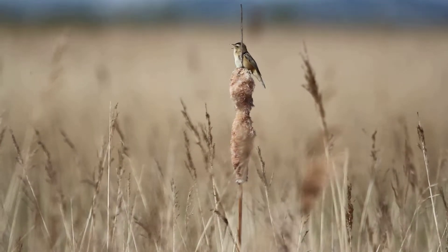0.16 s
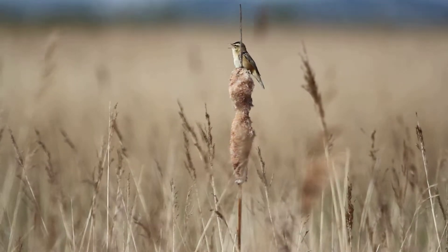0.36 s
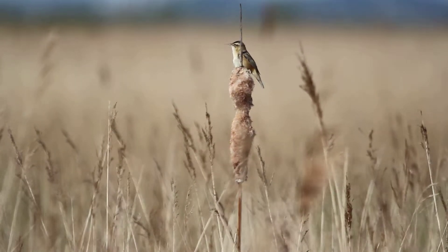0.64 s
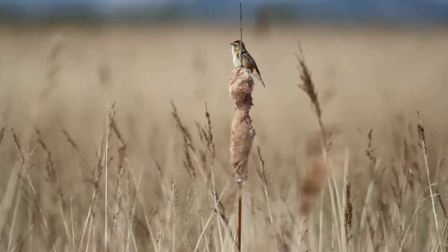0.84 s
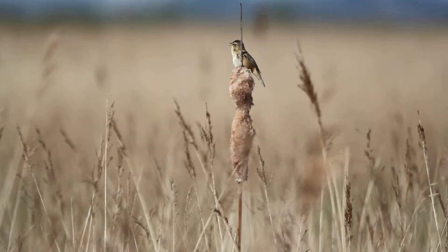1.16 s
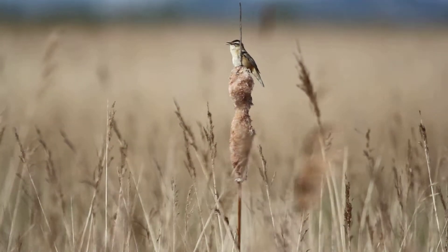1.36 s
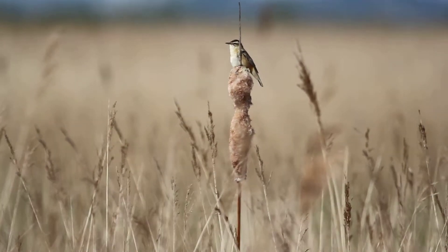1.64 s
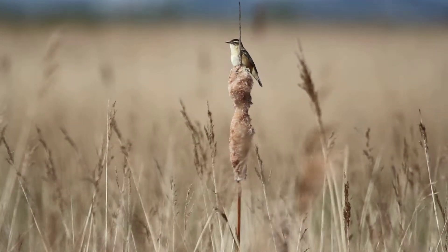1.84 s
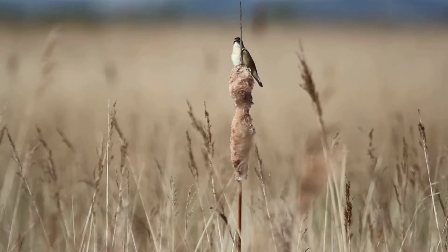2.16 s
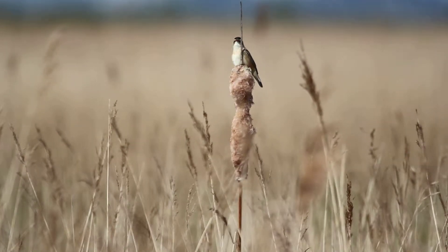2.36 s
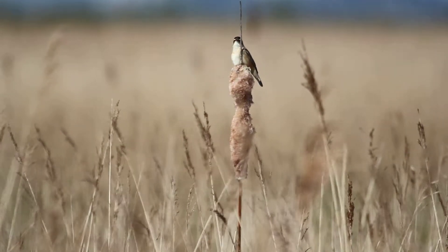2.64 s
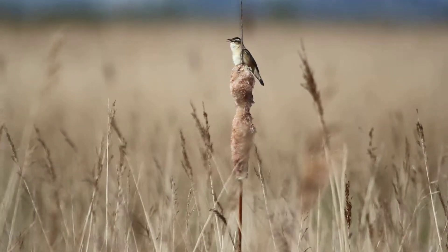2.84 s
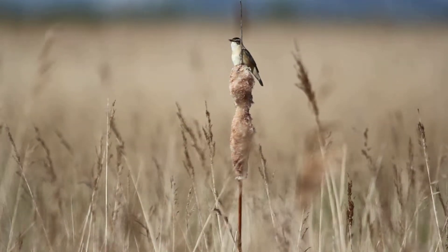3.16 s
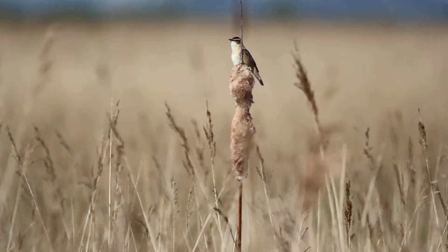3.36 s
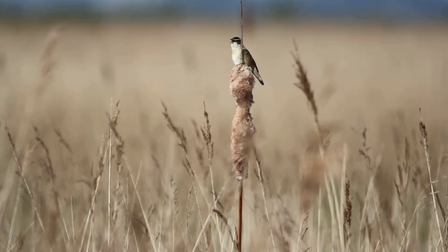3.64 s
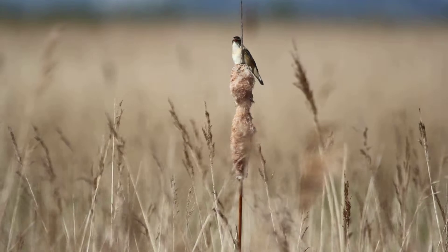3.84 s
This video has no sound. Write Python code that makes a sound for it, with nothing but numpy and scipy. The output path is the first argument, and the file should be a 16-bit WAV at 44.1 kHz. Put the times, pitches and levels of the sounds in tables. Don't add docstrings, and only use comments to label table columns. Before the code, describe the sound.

Small bird's song of fast churrs, thin whistles and scratchy repeated calls, with faint wind thumps outdoors

```python
import sys
import numpy as np
from scipy import signal
from scipy.fft import rfft, irfft
from scipy.io import wavfile
from scipy.ndimage import uniform_filter1d

SR = 44100
rng = np.random.default_rng(int(sys.argv[2]) if len(sys.argv) > 2 else 0)


def attenuation_scalar(level_db):
    decades = np.asarray(level_db, float) / 20
    return 10 ** decades


def int16_out(signal):
    q = np.round(np.clip(np.atleast_2d(signal).T, -1, 1) * 32767)
    wavfile.write(sys.argv[1], SR, q.astype(np.int16))


N = 176400

CHUR_WINDOW_S = 0.06


def shaped(x, points):
    hz, db = np.transpose(points)
    log_hz = np.log(np.fft.rfftfreq(len(x), 1 / SR) + 1)
    gain_db = np.interp(log_hz, np.log(hz), db, left=-90, right=-90)
    y = irfft(rfft(x) * attenuation_scalar(gain_db), len(x))
    return y / np.std(y)


def drift(rate_hz):
    r = np.exp(-2 * np.pi * rate_hz / SR)
    slow = signal.lfilter([1], [1, -2 * r, r * r], rng.standard_normal(N + SR))[SR:]
    return slow / np.std(slow)


def gate(t, start, end, attack, release):
    ramp = np.minimum((t - start) / attack, (end - t) / release)
    return np.sin(np.pi / 2 * np.clip(ramp, 0, 1)) ** 2


def add(out, start_s, x):
    i = int(start_s * SR)
    out[i:i + len(x)] += x[:N - i]


def turns(hz):
    return 2 * np.pi * np.cumsum(hz) / SR


def singer():
    voice = churs() + chacks() + buzz() + whistles()
    bent = voice ** 3 / (uniform_filter1d(voice ** 2, size=220) + attenuation_scalar(-73))
    treble = signal.butter(6, 10700, "high", fs=SR, output="sos")
    return voice + attenuation_scalar(-22.5) * signal.sosfilt(treble, bent)


def churs():
    # end_s, low_voice_hz, high_voice_hz, level_db, high_voice_relative_db
    near_churs = [(0.8765, 2437, 3170, -43, -1.5), (0.9664, 2440, 3156, -40, -6),
                  (1.061, 2400, 3110, -41.5, -4.5), (1.157, 2374, 3080, -41, -4),
                  (1.2449, 2344, 3030, -39.5, -7), (1.333, 2370, 3090, -40.5, -7),
                  (1.423, 2310, 3040, -41.5, -4), (2.024, 2464, 3170, -39, -4),
                  (2.1125, 2430, 3060, -37, -5), (2.204, 2370, 3080, -36, -6),
                  (2.306, 2390, 3150, -35.5, -5.5), (2.3993, 2356, 3130, -35, -6),
                  (2.4867, 2323, 3040, -35.5, -7), (2.5782, 2300, 2856, -35, -11.5),
                  (2.664, 2260, 2910, -35, -10.5), (2.7505, 2213, 2760, -34.5, -14),
                  (2.835, 2206, 2770, -34, -18), (2.918, 2264, 2820, -36.5, -11.5),
                  (3.01, 2324, 2980, -36.5, -7.5), (3.0976, 2397, 3070, -34, -11)]
    out = np.zeros(N)
    for end_s, low_hz, high_hz, db, high_db in near_churs:
        note = chur(low_hz, high_hz, high_db, 0, 12 + 0.6 * high_db)
        add(out, end_s - CHUR_WINDOW_S, attenuation_scalar(db) * note)
    return out


def chur(low_hz, high_hz, high_db, sums_db, hook_db):
    # multiple_of_low, multiple_of_gap, level_db
    sum_tones = [(2, 0, -0.5), (1, 2, -7.5), (2, -1, -7.5), (2, 1, -8.5), (2, 2, -13.5), (3, 0, -20),
                 (3, 1, -27), (1, 3, -14), (2, 3, -29), (3, -1, -21.5), (3, 2, -30), (4, -1, -45.5),
                 (4, 0, -34.5), (4, 1, -36)]
    chur_s, swell_s, low_db = 0.046, 0.018, -11.5
    t = np.arange(-int(CHUR_WINDOW_S * SR), 0) / SR

    def rise(before_end_s, width_s):
        return 1 / (1 + np.exp(-(t + before_end_s) / width_s))

    onset_dip = 0.0667 * np.exp(-np.maximum(t + chur_s, 0) / 0.0023)
    creep = 1 + 0.038 * (t + 0.02505) / chur_s - onset_dip
    low = turns(low_hz * creep * (1 + 0.592 * rise(0.0095, 0.001955)))
    high = turns(high_hz * creep * (1 + 0.883 * rise(0.010, 0.002424)))
    gap = high - low + rng.uniform(0, 8.14)

    both = gate(t, -chur_s, -0.0042, swell_s, 0.0082)
    wobble = 0.002 * np.cumsum(rng.standard_normal(len(t)))
    out = np.zeros(len(t))
    for m, n, db in sum_tones:
        phase = m * low + n * gap + m * n * n + m * m * wobble
        fade = gate(t, -1.11, -0.006 - 0.00022 * m, 1, 0.01)
        out += attenuation_scalar(db + sums_db + rng.normal(0, 1.8)) * fade * np.sin(phase)
    roughness = uniform_filter1d(rng.standard_normal(len(t)), size=60) * np.sqrt(60)
    out *= both * (1 + 0.15 * roughness)

    high_level = attenuation_scalar(high_db + (10.5 + 0.18 * sums_db) * rise(0.021, 0.0023))
    out += both * high_level * np.sin(low + gap)
    low_level = attenuation_scalar(low_db + (hook_db - low_db) * rise(0.01, 0.002))
    out += gate(t, -chur_s, 0.00077, swell_s, 0.0047) * low_level * np.sin(low)
    return np.sqrt(2) * out


def chacks():
    # start_s, level_db
    chack_calls = [(3.162, -24.5), (3.2538, -25), (3.3604, -26.5), (3.4601, -28), (3.5575, -26.5),
                   (3.671, -27), (3.7651, -26.5), (3.875, -26.5)]
    # multiple, level_db
    chack_tones = [(6, -16.5), (10, -2.), (11, -11), (12, -2), (13, -32), (14, -21), (15, -13), (16, -22),
                   (17, -19.5), (18, -20.5), (19, -43), ]
    # pitch_hz, level_db
    tick_throat = [(1180, -35), (2000, -17), (2820, -21.5), (4320, 1), (6360, -8.5), (9190, -28.5),
                   (15500, -25)]
    chack_s, tick_lead_s, tick_s = 0.023, 0.016, 0.016
    out, ticks, t = np.zeros(N), np.zeros(N), np.arange(N) / SR
    u = t[:int(0.03 * SR)]
    bend = 1 - 0.11 * np.exp(-u / 0.00094) - 0.085 * (u / chack_s) ** 2
    for start_s, db in chack_calls:
        phase = turns(411 * (1 + rng.normal(0, 0.012)) * bend)
        tone = np.zeros(len(u))
        for k, tone_db in chack_tones:
            a, b = rng.random(2)
            tone += attenuation_scalar(tone_db + 2.8 * (a - 0.5)) * np.sin(k * phase + 2 * np.pi * b)
        add(out, start_s - 0.0015, attenuation_scalar(db) * tone * gate(u, 0, chack_s + 0.0028, 0.0067, 0.012))
        tick_start_s = start_s - tick_lead_s
        ticks += attenuation_scalar(db - 4.5) * gate(t, tick_start_s, tick_start_s + tick_s, 0.0083, 0.0072)
        ticks += attenuation_scalar(db - 11) * gate(t, start_s - 0.001, start_s + chack_s, 0.003, 0.006)
    return out + ticks * rasp(tick_throat)


def buzz():
    # start_s, length_s, level_db, top_hz
    near_rasps = [
        (.006, 0.014, -36, 1790),
        (3.955, 0.0277, -29.5, 1704),
        (3.984, 0.016, -31.5, 1700),
    ]
    pulses_per_s = 58.3
    pulses = [(0.1365 + k / pulses_per_s, 0.017, -34, 1790) for k in range(9)]
    return arched(near_rasps + pulses)


def arched(rows):
    # multiple, level_db
    buzz_tones = [(1, -23), (2, -10), (3, -3), (4, -9.5), (5, -34)]
    # pitch_hz, level_db
    buzz_throat = [(1180, -27), (2000, -19), (3020, -10), (3320, -2), (5270, 2), (9840, -32), (15000, -38)]
    out, breath = np.zeros(N), rasp(buzz_throat)
    for start_s, length_s, db, top_hz in rows:
        u = np.arange(0, length_s, 1 / SR)
        phase = turns(top_hz * (1 - 0.22 * (2 * u / length_s - 1) ** 2))
        note = attenuation_scalar(-4) * np.resize(breath[int(start_s * SR):], len(u))
        for k, tone_db in buzz_tones:
            flutter = uniform_filter1d(rng.standard_normal(len(u)), size=40) * np.sqrt(40)
            note += attenuation_scalar(tone_db) * (1 + 0.8 * flutter) * np.sin(k * phase)
        add(out, start_s, attenuation_scalar(db) * note * gate(u, 0, length_s, 0.0065, 0.0068))
    return out


def rasp(throat):
    comb = np.zeros(int(SR / 403.5) + 1)
    comb[0], comb[-1] = 1, -0.45
    return shaped(signal.lfilter([1], comb, rng.standard_normal(N)), throat)


def whistles():
    # time_s, pitch_hz, level_db
    whistle_paths = [
        [(.394, 4480, -34.5), (.418, 4780, -28), (.453, 5000, -29.5), (.465, 4590, -27), (.473, 4450, -29)],
        [(.567, 5040, -32.5), (.605, 5105, -35), (.631, 4880, -31.5), (.64, 4480, -28.5), (.648, 4440, -29)],
        [(1.561, 5030, -30), (1.575, 5164, -32), (1.598, 5310, -31.5), (1.621, 5060, -27), (1.637, 4780, -28.5)],
        [(1.752, 5160, -30), (1.774, 5270, -30.5), (1.792, 5350, -30), (1.814, 5250, -29), (1.832, 4770, -29)],
    ]
    seconds_db = [-37, -42, -36.5, -35]
    out = np.zeros(N)
    for rows, second_db in zip(whistle_paths, seconds_db):
        at, pitch_hz, level_db = np.transpose(rows)
        start_s, length_s = at[0], at[-1] - at[0]
        u = np.arange(0, length_s, 1 / SR)
        hz = np.interp(u + start_s, at, pitch_hz) + 45 * drift(85)[:len(u)]
        db = np.interp(u + start_s, at, level_db) + 1.85 * drift(100)[:len(u)]
        phase = turns(hz - 2300 * np.exp(-u / 0.0033))
        second = attenuation_scalar(second_db + 11 * np.exp(-u / 0.008)) * np.sin(2 * phase)
        tone = np.sin(phase) + second
        add(out, start_s, np.sqrt(2) * attenuation_scalar(db) * tone * gate(u, 0, length_s, 0.0031, 0.0026))
    return out


def far_birds():
    # start_s, length_s, from_hz, to_hz, level_db
    far_whistles = [(0.09, .028, 5050, 4500, -70), (0.309, 0.03, 4050, 3700, -64),
                    (.352, .045, 5050, 4900, -67), (0.384, 0.056, 2650, 2900, -60),
                    (0.434, 0.028, 3850, 3520, -53), (0.624, 0.051, 3700, 2680, -52),
                    (0.674, 0.041, 2760, 2520, -53), (0.719, 0.028, 3650, 3640, -56),
                    (0.78, 0.036, 2950, 3480, -49.5), (.817, 0.014, 3250, 3600, -51),
                    (0.959, 0.047, 5750, 5800, -49.5), (1, 0.014, 5850, 5100, -52),
                    (1.429, .045, 3450, 3350, -64), (1.61, 0.048, 2300, 2650, -63),
                    (1.709, 0.039, 3900, 3720, -58.5), (1.86, 0.023, 3500, 4150, -55),
                    (1.773, 0.04, 2900, 3480, -54), (1.944, .025, 4600, 4240, -64),
                    (1.95, .025, 4300, 3460, -61), (2.228, 0.051, 4950, 5700, -49.5),
                    (2.527, 0.039, 5700, 5720, -47), (2.951, 0.049, 3300, 3500, -54),
                    (3.325, 0.0082, 5300, 6270, -47), (3.329, .008, 4900, 5100, -47),
                    (3.39, 0.081, 5100, 5660, -51), (3.734, .02, 4700, 4900, -46),
                    (3.819, 0.013, 4900, 4460, -42), (3.911, .018, 4500, 4650, -45)]
    # end_s, level_db
    far_churs = [(0.073, -43), (0.16, -42), (0.249, -47), (3.67, -47), (3.755, -48.5), (3.851, -51),
                 (3.939, -51), (2.55, -44), (2.638, -45), (2.727, -46), (2.811, -46)]
    # start_s, length_s, level_db, top_hz
    far_rasps = [
        (.505, 0.022, -45, 1210),
        (.527, 0.019, -44, 1210),
        (1.893, 0.019, -49, 1180),
        (1.915, 0.019, -48.5, 1168),
    ]
    # pitch_hz, level_db
    chatter_colour = [(1350, -67), (2300, -25.5), (4820, -2.5), (5700, -4.5), (8000, -16), (10400, -27),
                      (17600, -120)]
    out = attenuation_scalar(-59 + 3.8 * drift(33)) * shaped(rng.standard_normal(N), chatter_colour)
    for start_s, length_s, from_hz, to_hz, db in far_whistles + twitter():
        u = np.arange(0, length_s, 1 / SR)
        glide = from_hz + (to_hz - from_hz) * u / length_s
        phase = turns(glide - 400 * np.exp(-u / 0.0031))
        add(out, start_s, np.sqrt(2) * attenuation_scalar(db) * np.sin(phase) * gate(u, 0, length_s, 0.0012, 0.0023))
    for end_s, db in far_churs:
        add(out, end_s - CHUR_WINDOW_S, attenuation_scalar(db) * chur(2730, 3280, -2, -25, 4))
    return out + arched(far_rasps)


def twitter():
    notes = []
    for a, b, c, d, e in rng.random((150, 5)):
        from_hz = 2600 * 2.3 ** c
        notes.append((3.95 * a, 0.012 + 0.03 * b, from_hz, from_hz * (0.85 + 0.3 * d), -56.5 - 9 * e))
    return notes


def echoes(x):
    u = np.arange(SR // 2) / SR
    tail = rng.standard_normal(len(u)) * attenuation_scalar(-60 * u / 0.35) * (u > 0.003)
    tail = signal.lfilter([1], [1, -0.5], tail)
    return signal.fftconvolve(x, tail / np.sqrt(np.sum(tail ** 2)))[:N]


def reeds():
    # time_s, peak_db
    reed_ticks = [(0.5054, -46), (0.5487, -45), (0.6659, -45), (0.7143, -46), (0.8465, -48), (0.933, -44),
                  (1.0735, -48), (1.2466, -50), (1.2665, -40), (1.6771, -44), (1.8592, -34), (1.9126, -47),
                  (2.14, -38), (2.172, -42), (2.2737, -42), (2.3401, -39), (2.4458, -46), (2.4828, -41),
                  (2.5416, -49), (2.615, -49), (2.7057, -40), (2.801, -49), (2.9522, -45), (3.0634, -46),
                  (3.2141, -51), (3.3004, -33), (3.38, -33), (3.6416, -39), (3.9244, -41), (3.9504, -53)]
    faint = [(3.6 * a, -47 - 5.1 * b) for a, b in rng.random((40, 2))]
    clicks = np.zeros(N)
    for at_s, db in reed_ticks + faint:
        burst = rng.standard_normal(90) * np.exp(-np.arange(90) / 34)
        add(clicks, at_s + 0.0012, attenuation_scalar(db + 0.5) * burst)
    return signal.sosfilt(signal.butter(2, 8000, "high", fs=SR, output="sos"), clicks)


def wind():
    # centre_s, width_s, level_db
    gust_times = [(.29, 0.039, -38.5), (.54, 0.01, -43), (0.783, 0.0065, -20.5), (0.805, 0.016, -19),
                  (1.025, 0.0071, -28), (3.05, 0.013, -38.5), (.93, 0.07, -33.5), (1.151, 0.054, -29.5),
                  (1.669, 0.025, -27.5), (1.99, 0.02, -38), (2.251, 0.014, -33), (2.652, 0.012, -36),
                  (3.564, 0.0093, -20), (3.641, 0.16, -28.5), (3.758, 0.0083, -12.5), (3.812, 0.043, -22.5),
                  (3.914, 0.019, -12)]
    # pitch_hz, level_db
    gust_colour = [(24, -65), (40, -4), (146, 3.5), (245, -7), (399, -21.5), (600, -36.5), (780, -32),
                   (1320, -120)]
    # pitch_hz, level_db
    air_colour = [(15, -29), (25, -3), (75, 8), (241, -6.5), (460, -1.5), (2140, -21), (4800, -22.5),
                  (5790, -33), (15700, -31.5)]
    t = np.arange(N) / SR
    strength = attenuation_scalar(-56.5 + 5.4 * drift(2))
    for centre_s, width_s, db in gust_times:
        strength += attenuation_scalar(db) * np.exp(-((t - centre_s) / width_s) ** 2)
    lumps = shaped(rng.standard_normal(N), gust_colour)
    lumps = lumps / np.sqrt(uniform_filter1d(lumps ** 2, size=1500) + 0.1)
    lumps *= attenuation_scalar(2.5 * drift(30) - 3)
    air = attenuation_scalar(-44.5 + 1.1 * drift(4.2)) * shaped(rng.standard_normal(N), air_colour)
    return strength * lumps + air


def scene():
    birds = singer() + far_birds()
    mix = birds + attenuation_scalar(-13.5) * echoes(birds) + reeds() + wind()
    return mix[None]


def top_cut(x):
    return signal.sosfilt(signal.butter(12, 15850, fs=SR, output="sos"), x)


def record(dry):
    return top_cut(dry)


dry = scene()
out = record(dry)
int16_out(out)
```